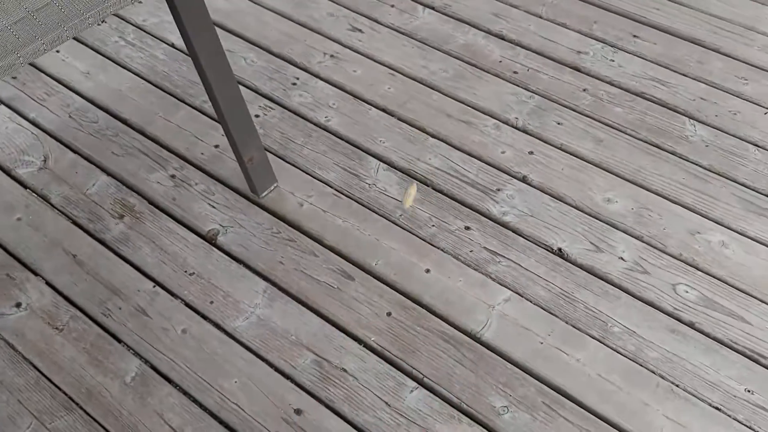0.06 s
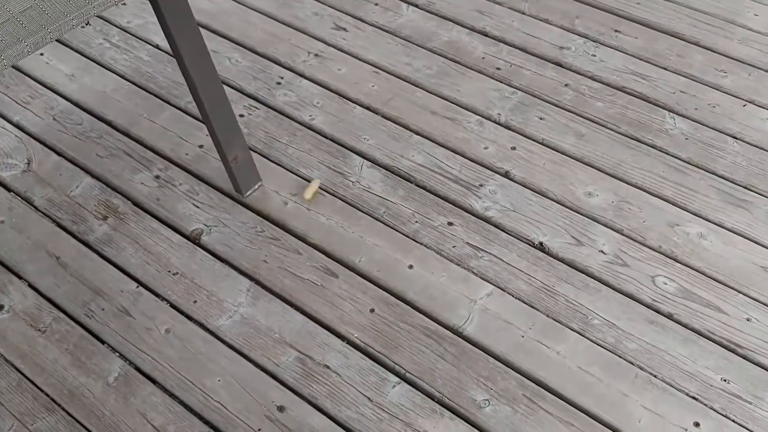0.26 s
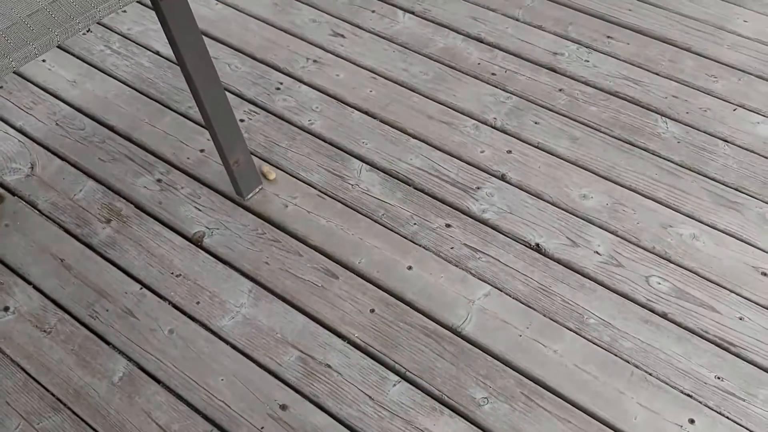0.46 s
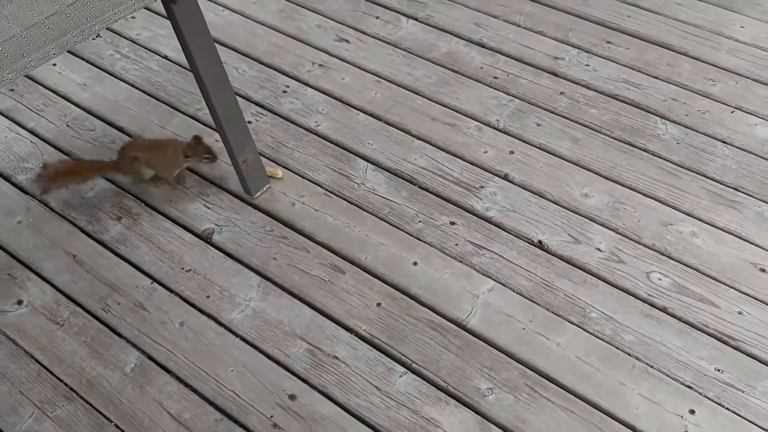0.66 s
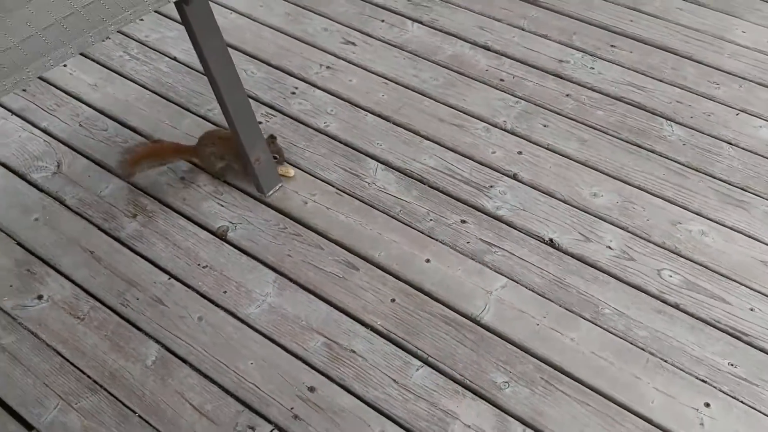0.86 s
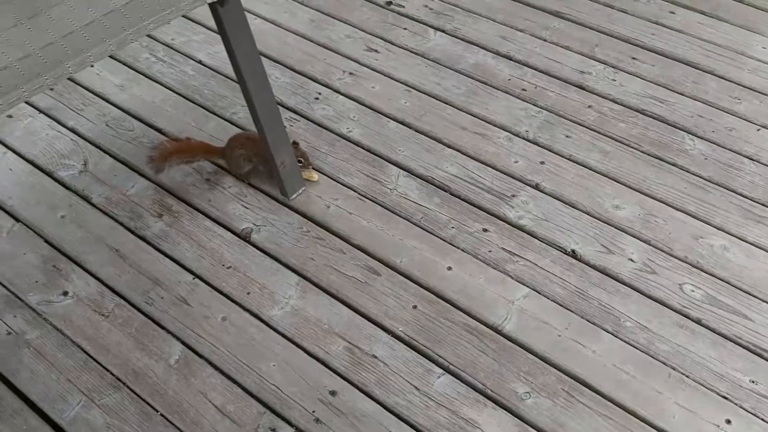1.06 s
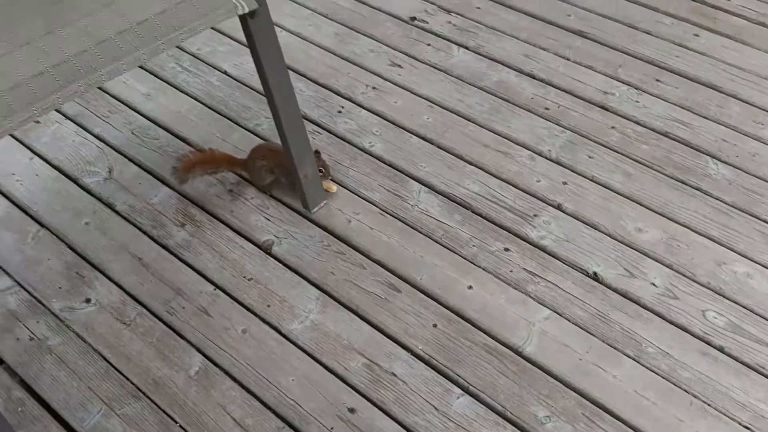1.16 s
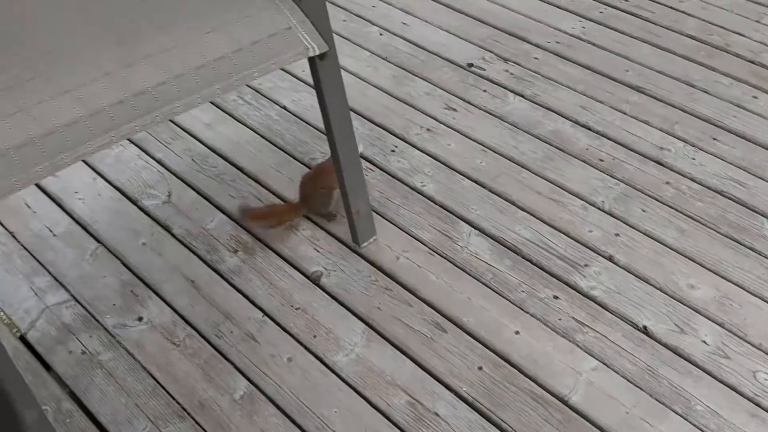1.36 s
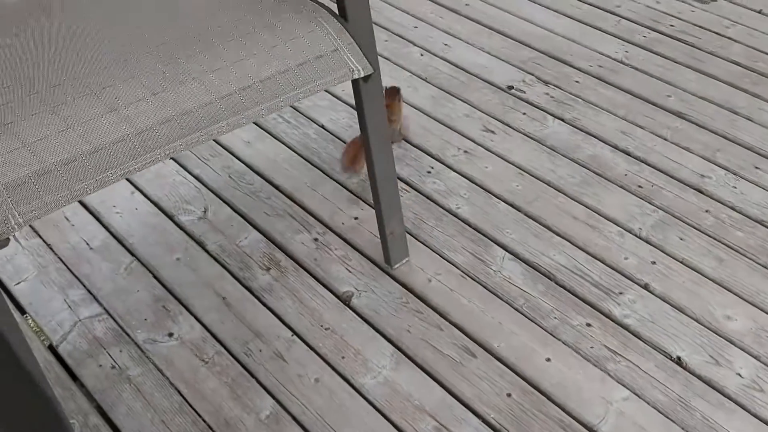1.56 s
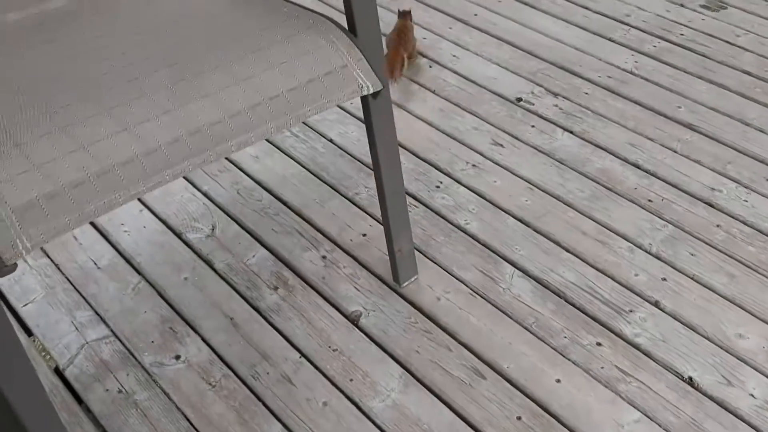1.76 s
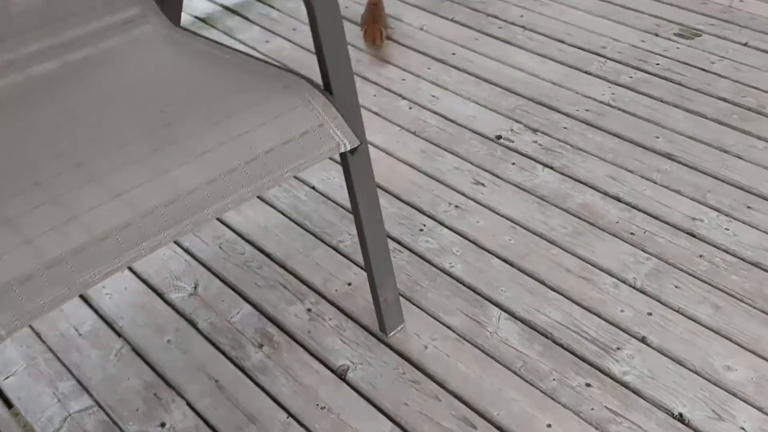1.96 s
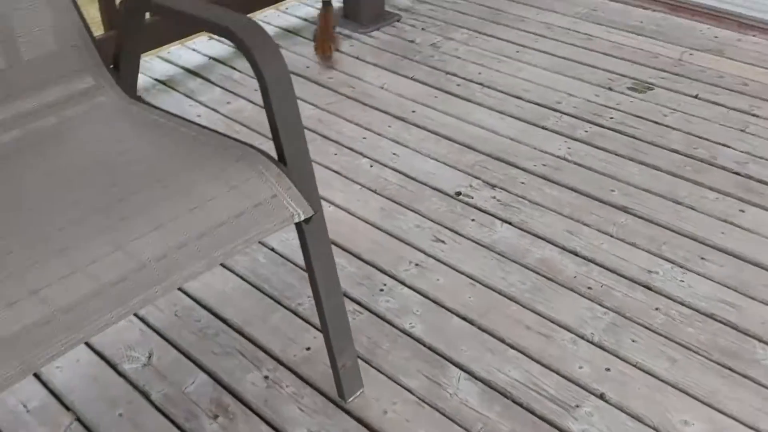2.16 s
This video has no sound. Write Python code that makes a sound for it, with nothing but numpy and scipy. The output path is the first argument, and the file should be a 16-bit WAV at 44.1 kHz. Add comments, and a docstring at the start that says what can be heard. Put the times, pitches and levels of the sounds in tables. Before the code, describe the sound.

A peanut cracks onto a wooden deck and tumbles, then a distant bird calls.

```python
"""Peanut on the deck

A tossed peanut cracks onto a wooden deck, sets the boards booming and tumbles to rest; the house
wall answers. A squirrel snaps it up with dry clicks and patters away. A far, woodpecker-like bird
starts a run of hoarse, arched notes that echo in the trees, over a low outdoor rumble."""
import sys
import numpy as np
from scipy import signal
from scipy.fft import rfft, irfft, next_fast_len
from scipy.io import wavfile
from scipy.ndimage import map_coordinates

SR = 44100
rng = np.random.default_rng(int(sys.argv[2]) if len(sys.argv) > 2 else 0)


def master(y):
    """Save y as 16-bit WAV."""
    cut = np.clip(np.atleast_2d(y).T, -1, 1)
    pcm = np.round(cut * 32767)  # scale
    wavfile.write(sys.argv[1], SR, pcm.astype(np.int16))


N = 97020


def deck_knocks():
    """The peanut lands and tumbles, then paws patter; the softer contacts are duller than the first."""
    # contacts: start_s, level_db, tilt_db_per_octave, echo_db, first_board_db, next_board_db, shell_ratio
    contacts = [(0.2284, -17.5, 0.5, -3, 0.5, -22, 0.97), (0.2481, -29.5, -13, -10, -12, -22.5, 1),
                (0.3595, -36.5, -3.5, -0.5, -9, 4, 1.15), (0.3654, -34, -2, 1, -17, 7, 0.53),
                (.3755, -39, -3, 2, -12, -21, 0.65), (.433, -42, -6, 5, -16, -15, 0.93),
                (0.4703, -41, -6, 3.5, -15, -12, 0.97), (0.626, -50.5, -7, 6.5, -2.5, -10, 1.1),
                (1.381, -46.5, -7, 4, -16, -13, 0.91), (1.864, -44.5, -11.5, 5, -12, -6, 0.63),
                (1.901, -41.5, -17.5, -8, -7, -1, 0.6)]
    low_cut = signal.butter(2, 110, "highpass", fs=SR, output="sos")
    t = np.arange(SR // 2) / SR
    out = np.zeros((2, N))
    for start_s, level_db, tilt, echo_db, first_db, next_db, shell_ratio in contacts:
        knock = shell_crack(t, shell_ratio) + board_boom(t, first_db, next_db) + deck_echo(t, echo_db)
        knock = signal.sosfilt(low_cut, knock)
        # the tilt acts on the treble, from about 2 kHz up
        knock = filtered(knock, lambda hz: amp(tilt * np.log2(np.hypot(1, hz / 2000))))
        add(out, start_s, amp(level_db) * knock)
    return out


def shell_crack(t, pitch_ratio):
    """A contact cracks and rings hollow for an instant; the house wall throws it back."""
    # tone of the crack: freq_hz, level_db
    crack_tone = [(150, -20), (400, 3), (1600, 0.5), (1950, -8.5), (2900, -5.5), (4500, -2), (7000, -12),
                  (8500, -11.5), (12000, -8.5), (15500, -11.5)]
    # stereo spread of the crack: freq_hz, left_minus_right_db
    crack_pan = [(400, 0.5), (1800, -2), (4000, -0.5), (7000, 4), (9500, -9), (14000, -6.5)]
    # hollow modes of the shell on the board: base_pitch_hz, level_db, t60_s, left_minus_right_db
    shell_modes = [(915, -3.5, 0.0081, 1.5), (1506, 2, 0.016, -9), (1680, -3.5, 0.022, -5),
                   (2290, -12, .012, -8), (7320, -5, 0.008, 8.5), (10350, -6.5, .005, -13)]
    # wall reflections: delay_s, level_db
    reflections = [(.0091, -11.5), (0.0137, -11.5)]
    attack_s = 0.0012
    attack = np.minimum(t / attack_s, 1) ** 2
    since_peak = np.maximum(t - attack_s, 0)
    burst = filtered(noise(crack_tone, len(t)), lambda hz: pan(along(crack_pan, hz)))
    direct = amp(4) * burst * attack * fade(since_peak, t60=0.01)
    for hz, db, t60, side_db in shell_modes:
        phase = 2 * np.pi * hz * pitch_ratio * (t - attack_s) + rng.normal(0, 0.5, (2, 1))
        direct += pan(side_db) * amp(db) * attack * fade(since_peak, t60) * np.sin(phase)
    out = direct.copy()
    for delay_s, db in reflections:
        add(out, delay_s, amp(db) * direct[::-1])  # left and right swap
    return out


def board_boom(t, first_db, next_db):
    """Two deck boards ring in decaying modes; the low ones bloom more slowly."""
    # modes of the board the peanut lands on: pitch_hz, level_db, t60_s
    first_board = [(272.8, -6, 0.29), (306.5, -16, 0.43), (376, -11.5, .18), (663, -17.5, 0.27),
                   (760, -19, 0.23), (928, -15, 0.12), (1092, -15.5, 0.13), (1326, -17, 0.12),
                   (1445, -15, .13), (1665, -19.5, 0.12), (2092, -22, .12), (2226, -18.5, 0.089),
                   (4798, -25, .14), (6970, -26, .15)]
    # modes of the next board, where it tumbles: pitch_hz, level_db, t60_s
    next_board = [(610, -11, .12), (678, -10, .13), (915, -5.5, .14), (1495, -10, 0.1), (2103, -9.5, 0.11),
                  (2350, -9.5, 0.076), (2490, -13, .08)]
    attack_cycles = 3.4
    out = np.zeros((2, len(t)))
    for struck_db, modes in [(first_db, first_board), (next_db, next_board)]:
        for hz, db, t60 in modes:
            stereo_phase = rng.normal(0, 1, (2, 1)) * min(hz / 1500, 1)  # higher modes sound wider
            envelope = rise(t, attack_cycles / hz) * fade(t, t60)
            out += pan(-2) * amp(db + struck_db) * envelope * np.sin(2 * np.pi * hz * t + stereo_phase)
    return out


def deck_echo(t, level_db):
    """Walls and deck scatter a knock into a short wash, each band dying at its own rate."""
    # tone of the wash: freq_hz, level_db
    echo_tone = [(120, -39.5), (250, -3), (450, -5), (900, -7.5), (1600, -7), (1950, -10), (2500, -10.5),
                 (3600, -14.5), (4800, -18), (7000, -17), (8500, -25), (15000, -24.5)]
    # its decay: freq_hz, t60_s
    echo_decay = [(250, 0.29), (1400, 0.21), (4000, 0.17), (12000, 0.25)]
    # its stereo spread: freq_hz, left_minus_right_db
    echo_pan = [(300, 5), (1800, -3), (3300, -1.5), (4700, 2.5), (7000, 2.5), (9000, -4), (14000, -1)]
    wash = filtered(noise(echo_tone, len(t)), lambda hz: pan(along(echo_pan, hz)))
    band_hz, frame_s, bands = signal.stft(wash, SR, nperseg=256)
    bands *= fade(frame_s, along(echo_decay, band_hz)[:, None])
    tail = signal.istft(bands, SR, nperseg=256)[1][:, :len(t)]
    return amp(level_db - 4) * rise(t, 0.0038) * tail


def clicks():
    """Shell, teeth and claws make tiny dry snaps, each with one short ring and a faint echo."""
    # the snaps: start_s, level_db, ring_hz
    snaps = [(0.195, -43, 5850), (0.442, -45, 6120), (1.2377, -31.5, 3010), (1.4342, -47.5, 4120)]
    # tone of a snap: freq_hz, level_db
    snap_tone = [(1500, -26), (3000, -1), (6000, -3.5), (10500, -1.5), (12500, -20.5), (16000, -16)]
    t = np.arange(SR // 4) / SR
    echo = amp(-22) * rise(t, 0.012) * fade(t, t60=0.2)
    out = np.zeros((2, N))
    for start_s, level_db, ring_hz in snaps:
        snap = noise(snap_tone, len(t)) * (fade(t, t60=0.0067) + echo)
        ring = amp(6.5) * fade(t, t60=0.0044) * np.sin(2 * np.pi * ring_hz * t)
        add(out, start_s, amp(level_db) * rise(t, 0.0002) * (snap + ring))
    return out


def far_knock():
    """One soft knock from farther off, nearly all echo."""
    # tone of the knock: freq_hz, level_db
    knock_tone = [(300, -10), (800, -0.5), (1300, 3.5), (2300, 2.5), (3000, -7.5), (4200, -6), (5500, -18),
                  (7500, -17), (10000, -28.5), (15000, -29)]
    t = np.arange(SR // 2) / SR
    knock = amp(-37) * noise(knock_tone, len(t)) * rise(t, 0.0032) * fade(t, t60=0.3)
    out = np.zeros((2, N))
    add(out, start_s=0.5125, sound=knock)
    return out


def bird():
    """Each note arches up, swells and drops under a hoarse overtone; the trees smear it into a tail."""
    # the run of notes: start_s, top_pitch_hz, level_db, hoarse_db, rasp_db, overtone_db
    notes = [(1.064, 1940, -54, -32, -45, -32), (1.198, 2150, -51, -19, -30, -22),
             (1.346, 2170, -47, -15, -36, -16), (1.484, 2270, -42.5, -19, -44, -26),
             (1.62, 2270, -41, -15, -38, -12), (1.751, 2130, -41.5, -14, -36, -10),
             (1.884, 2120, -41.5, -14, -30, -16), (2.025, 2280, -45, -14, -20, -9)]
    # hoarse hiss of the upper voice: freq_hz, level_db
    hoarse_tone = [(900, -8.5), (1400, 6.5), (2500, -5.5), (3100, -3.5), (3900, 3.5), (4350, -8.5),
                   (4600, -5), (5100, -20), (7200, -20), (8500, -33), (12000, -33)]
    note_s, crest = 0.056, 0.399  # the pitch tops out this far through the note
    climb, drop, jitter = 0.1392, 0.225, 0.0279  # fractions of the pitch
    ring_hz, ring_width_hz, flutter_db = 4160, 51, 2
    t = np.arange(SR // 2) / SR
    progress = np.minimum(t / note_s, 1)
    upswing = 1 - climb * (1 - progress / crest) ** 2
    downswing = 1 - drop * ((progress - crest) / (1 - crest)) ** 2
    arch = np.where(progress < crest, upswing, downswing)
    envelope = np.sqrt(np.abs(np.sin(np.pi * progress)))
    swell = amp(10.4 * (progress - 1.5))
    out = np.zeros((2, N))
    for start_s, top_hz, level_db, hoarse_db, rasp_db, overtone_db in notes:
        pitch_hz = top_hz * arch * (1 + jitter * wobble(521.6, len(t)))
        phase = 2 * np.pi * np.cumsum(pitch_hz) / SR
        flutter = amp(flutter_db * wobble(237, len(t)))
        rasp = amp(rasp_db) * (np.sin(phase / 2) + np.sin(1.5 * phase))
        voice = pan(-4.5) * envelope * flutter * (swell * np.sin(phase) + rasp)
        # a narrow resonance picks out the octave
        octave = envelope * np.sin(2 * phase)
        overtone = filtered(octave, lambda hz: 1 / (1 + 2j * (hz - ring_hz) / ring_width_hz))
        hoarse = amp(hoarse_db - 3) * envelope * noise(hoarse_tone, len(t))
        upper = pan(1) * (amp(overtone_db) * overtone + hoarse)
        note = amp(6) * voice + amp(0.5) * upper + amp(7) * tree_echo(t, voice + upper)
        add(out, start_s, amp(level_db) * note)
    return out


def tree_echo(t, call):
    """The trees scatter a call into a dense, fading tail."""
    scatter = rng.standard_normal((2, len(t))) * fade(t, t60=0.62)
    return signal.fftconvolve(call, scatter / np.linalg.norm(scatter[0]), axes=1)[:, :len(t)]


def outdoor_rumble():
    """A low, gently swaying rumble, near the centre in the bass and wider above, with narrow hums."""
    # tone of the rumble before its treble roll-off: freq_hz, level_db
    rumble_tone = [(15, -61), (25, -32.5), (85, -12.5), (118, -14.5), (147, -8.5), (204, -7.5), (252, -7.5),
                   (307, -4.5), (338, -8), (372, -11.5), (528, -6.5), (826, -12), (965, -16.5), (1040, -15),
                   (2600, -35), (3380, -85.5), (5720, -120)]
    # how alike its two sides are: freq_hz, correlation
    likeness = [(100, 0.94), (300, 0.71), (700, 0.29), (1500, .3)]
    # hums in the rumble: pitch_hz, width_hz, level_db
    hum_bands = [(208.4, 7, -61.5), (300, 19, -61), (534.6, 5.3, -61.5)]
    rolloff_hz = 1860

    def mid_side_gains(hz):
        """Split each band into centre and width, and roll off the treble."""
        angle = np.arccos(np.clip(along(likeness, hz), -1, 1)) / 2
        return np.array([np.cos(angle), np.sin(angle)]) / np.hypot(1, (hz / rolloff_hz) ** 8)

    mid, side = filtered(noise(rumble_tone, N), mid_side_gains)
    sway_db = wobble(10, N)
    rumble = pan(-1) * amp(-47.5 + sway_db) * unit(np.array([mid + side, mid - side]))
    hums = sum(amp(db) * noise_band(hz, width_hz, channels=1) for hz, width_hz, db in hum_bands)
    return rumble + hums


def far_whistle():
    """A thin, breathy whistle swells and fades at the very start."""
    peak_s, swell_s = 0.12, 0.19
    swell = np.exp(-((np.arange(N) / SR - peak_s) / swell_s) ** 2)
    return amp(-73) * swell * noise_band(centre_hz=6900, width_hz=780, channels=2)


def faint_hiss():
    """A steady hiss far beneath everything."""
    # tone of the hiss: freq_hz, level_db
    hiss_tone = [(500, 3), (2500, 1), (5000, -5), (7000, -3), (9500, -8.5), (13000, -1), (16000, -5)]
    return amp(-74.5) * noise(hiss_tone, N)


def amp(db):
    """Decibels to gain."""
    return 10 ** (np.asarray(db) / 20)


def unit(x):
    """Scale to rms 1."""
    return x / np.sqrt(np.mean(x ** 2) + 1e-20)


def along(points, hz):
    """Read a curve of (freq_hz, value) points on a log frequency axis."""
    freqs, values = np.transpose(points)
    return np.interp(np.log(hz + 1), np.log(freqs + 1), values)


def pan(db):
    """Left and right gains for a level difference; positive leans left."""
    return amp(np.array([[0.5], [-0.5]]) * db)


def filtered(x, response):
    """Shape x with a gain given as a function of frequency."""
    size = x.shape[-1]
    padded = next_fast_len(size + 8192)
    return irfft(rfft(x, padded) * response(np.fft.rfftfreq(padded, 1 / SR)), padded)[..., :size]


def noise(spectrum, size):
    """Coloured noise of rms 1, unrelated left and right."""
    return unit(filtered(rng.standard_normal((2, size)), lambda hz: amp(along(spectrum, hz))))


def noise_band(centre_hz, width_hz, channels):
    """A narrow band of noise of rms 1."""
    white = rng.standard_normal((channels, N))
    return unit(filtered(white, lambda hz: np.exp(-((hz - centre_hz) / width_hz) ** 2 / 2)))


def wobble(rate, size):
    """A smooth random curve, rate knots a second."""
    return map_coordinates(rng.standard_normal(2048), [np.arange(size) * rate / SR + 2], mode="wrap")


def fade(t, t60):
    """Exponential decay, 60 dB down after t60 seconds."""
    return np.exp(-np.log(1000) * t / t60)


def rise(t, seconds):
    """Soft attack."""
    return 1 - np.exp(-t / seconds)


def add(track, start_s, sound):
    """Mix a sound into the track at start_s."""
    part = track[:, round(start_s * SR):][:, :sound.shape[-1]]
    part += sound[..., :part.shape[1]]


def scene():
    """The deck up close, the bird beyond it and the outdoor bed underneath."""
    return deck_knocks() + far_knock() + clicks() + bird() + outdoor_rumble() + far_whistle() + faint_hiss()


def record(dry):
    """A steep high cut takes off the very top of the treble."""
    top_hz, slope_hz = 16300, 600
    return filtered(dry, lambda hz: np.clip((top_hz - hz) / slope_hz, 0, 1))


dry = scene()
out = record(dry)
master(out)
```